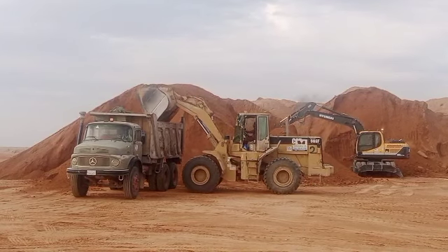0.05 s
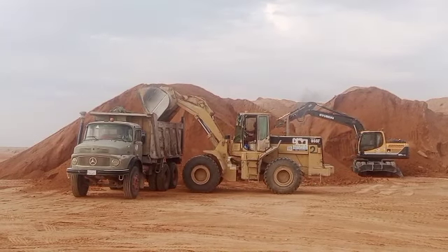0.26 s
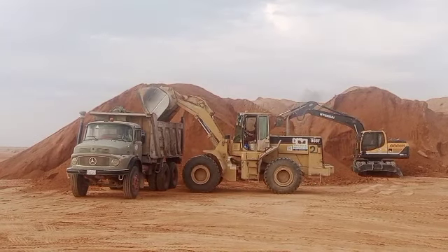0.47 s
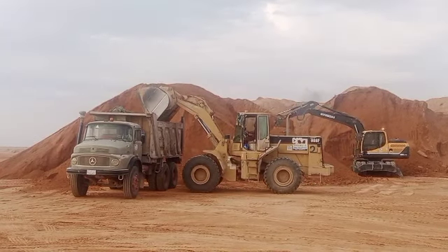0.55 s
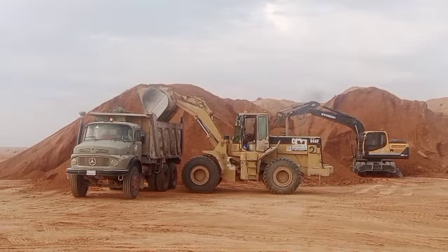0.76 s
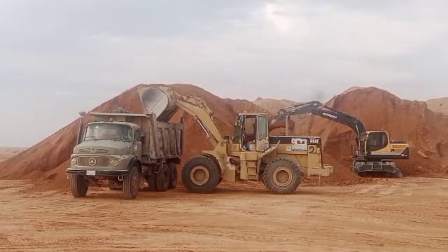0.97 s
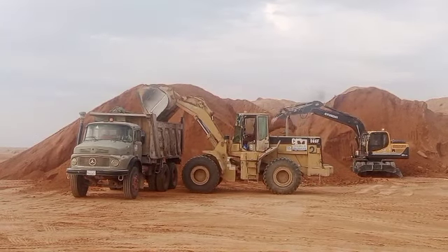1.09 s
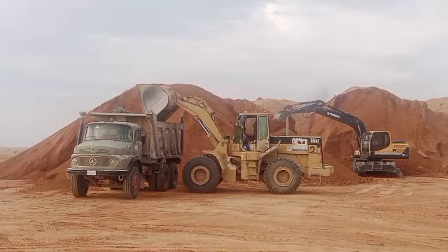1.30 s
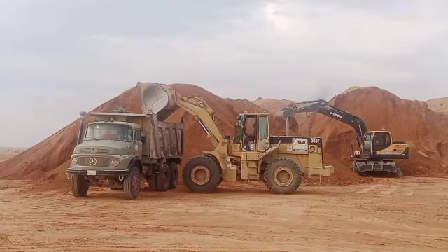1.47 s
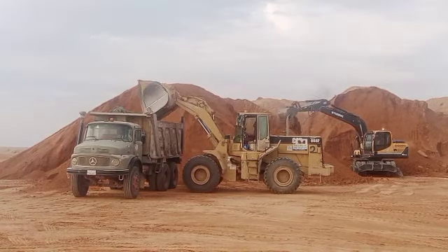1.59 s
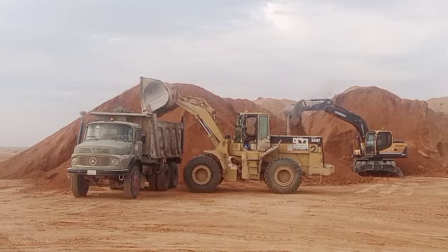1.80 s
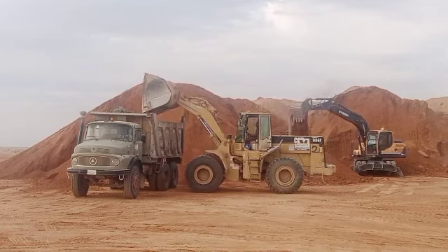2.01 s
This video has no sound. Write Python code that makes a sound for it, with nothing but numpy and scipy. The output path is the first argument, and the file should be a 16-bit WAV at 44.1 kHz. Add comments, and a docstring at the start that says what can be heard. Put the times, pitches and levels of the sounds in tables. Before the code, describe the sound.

A loader bucket hits a dump truck's steel bed at about 0.2 seconds, juddering and scraping with a short squeal until 0.4. The bed booms and rings out. Duller hollow knocks follow from 0.5 to 1.8 seconds, with faint squeaks. Diesel engines rumble and whine quietly throughout, growing a little louder after 1.2 seconds, and soft hydraulic groans join from about 1.4 seconds.

```python
"""Diesel engines rumble across a site with a rasping whine, soft hydraulic groans and faint squeaks.
Almost at once a loader's bucket strikes the steel bed of a dump truck. It judders along the bed for
a fifth of a second with a short squeal, and the bed booms and rings out. Duller knocks follow as the
bucket lifts clear, and the engines grow a little louder."""
import sys
import numpy as np
from scipy import signal
from scipy.fft import rfft, irfft
from scipy.io import wavfile

SR = 44100
rng = np.random.default_rng(int(sys.argv[2]) if len(sys.argv) > 2 else 0)


def generate_wav(sig):
    """Save sig (samples, or channels by samples) to the path in sys.argv[1] as 16-bit PCM at SR."""
    pcm = np.round(np.clip(np.atleast_2d(sig).T, -1, 1) * 32767).astype(np.int16)
    wavfile.write(sys.argv[1], SR, pcm)


N = 90404
T = np.arange(N) / SR

# how loud the engines' rumble, clatter and whine are over time: time_s, level_db
RUMBLE_LEVEL = [(0, -54), (.3, -52), (.62, -53), (.68, -46.5), (.78, -50.5), (.8, -61), (.93, -56.5),
                (1.02, -54), (1.3, -48), (1.68, -54.5), (1.78, -46.5), (1.93, -56.5), (2.05, -46)]
CLATTER_LEVEL = [(0, -66), (.62, -63.5), (.84, -60), (.95, -60), (1.06, -63), (1.2, -54.5), (1.36, -55.5),
                 (1.64, -55.5), (1.71, -60), (1.76, -54.5), (1.9, -58.5), (2.05, -55)]
WHINE_LEVEL = [(0, -67), (.2, -60.5), (.43, -56), (.6, -62.5), (.68, -55), (.8, -61), (1.13, -60),
               (1.25, -53.5), (1.47, -53.5), (1.7, -59), (1.8, -53), (1.94, -63.5), (2.03, -53.5)]
# the mix of low and high in the engines' rumble, clatter and hiss: frequency_hz, relative_db
RUMBLE_TONE = [(20, -33), (40, -17), (62, -7), (100, -6.5), (150, -4), (230, 0.5), (330, -7.5),
               (410, -17.5), (520, -28), (1000, -68)]
CLATTER_TONE = [(200, -34), (490, -11), (610, 3.5), (730, 5), (900, 4), (1150, 2.5), (1380, -4.5),
                (1900, -10), (2150, -28), (2600, -31.5), (3600, -25.5), (4500, -54.5), (6000, -65.5)]
HISS_TONE = [(1000, -5), (2400, 3.5), (3000, -6.5), (3700, -8), (4600, -21.5), (5500, -22.5), (6400, -12),
             (7500, -15), (8800, -24), (15500, -25.5)]
# groans of the hydraulics: start_s, hold_s, pitch_hz, level_db
GROANS = [(-0.02, 0.064, 627, -62.5), (1.396, 0.28, 714, -55.5), (1.595, 0.059, 902, -56),
          (1.614, 0.03, 1130, -62.5), (1.813, 0.18, 871, -64.5)]
# dull knocks of the bed and the arm's joints: start_s, level_db, pitch_hz, length_s
KNOCKS = [(0.015, -49.5, 232.3, 0.082), (0.164, -46.5, 243, 0.049), (0.492, -38.5, 242, 0.041),
          (0.54, -36.5, 212, 0.037), (0.636, -44, 268, 0.036), (0.665, -40, 214, 0.039),
          (0.715, -40, 175.6, 0.078), (0.761, -39.5, 255.7, 0.031), (1.008, -43, 237.6, 0.068),
          (1.11, -49, 234.3, 0.09), (1.23, -41, 138, 0.036), (1.299, -43.5, 147, 0.041),
          (1.42, -37.5, 229, 0.031), (1.551, -42.5, 290, 0.023), (1.578, -46, 346, 0.053),
          (1.738, -37, 248, 0.024), (1.8, -49.5, 224, 0.063)]
# the deep boom of the hollow bed: frequency_hz, relative_db
BOOM_TONE = [(25, -43.5), (48, -32), (80, -8), (130, 15.5), (280, 4), (350, 4), (450, -39), (600, -51.5),
             (1200, -81)]
# squeaks of steel: start_s, hold_s, pitch_hz, level_db, noise_share
SQUEAKS = [(0.135, .085, 9128, -80, .08), (0.22, 0.04, 6820, -69, .15), (0.259, 0.013, 6850, -54, .12),
           (0.259, 0.017, 3680, -48, .3), (0.262, 0.03, 3880, -58, 1), (0.259, 0.04, 7500, -72, 1.5),
           (0.333, 0.02, 7600, -71, 1.3), (0.324, 0.015, 6080, -76, .5), (0.366, 0.045, 3260, -62, .4),
           (0.42, 0.14, 3190, -66, .4), (0.504, 0.06, 7810, -85, .8), (0.505, 0.05, 6100, -85, .8),
           (0.294, 0.024, 1720, -40, .5), (0.332, 0.022, 1165, -39, .3), (0.46, 0.018, 1630, -43, .4),
           (0.325, 0.085, 780, -47.5, .8), (1.214, 0.025, 7490, -74, .7), (1.338, 0.018, 7410, -77, .8),
           (1.4, 0.05, 7300, -86, .6)]
# moments when the bucket bites into the bed: start_s, level_db
BITES = [(0.21, -36.5), (0.25, -35), (0.297, -38.5), (0.332, -39.5), (0.378, -47.5)]
# the scrape of steel on steel: frequency_hz, relative_db
SCRAPE_TONE = [(280, -27), (450, -11.5), (583, 2.5), (1000, 3), (1170, -0.5), (1420, -5), (1690, 5),
               (2070, -6.5), (2280, -26.5), (2500, -8), (2850, -24), (3300, -12.5), (3900, -28.5),
               (4600, -53), (5600, -51.5), (6300, -45.5), (7600, -34.5), (8800, -60), (12500, -55),
               (15500, -74)]
# ringing notes of the bucket's lip and of the bed: pitch_hz, level_db, ring_s (time to fade 60 dB)
LIP_NOTES = [(620.7, -27, 0.095), (912, -38, 0.099), (977, -37.5, 0.36), (1168, -38, 0.23),
             (1652, -42.5, 0.59)]
BED_NOTES = [(77.8, -34, 0.4), (146.4, -28, 0.75), (199, -32.5, 0.2), (242, -44.5, 0.1),
             (277.2, -26.5, 0.22), (349.3, -29.5, 0.11), (406, -34, 0.09), (1160, -49.5, 0.38)]
# blows of the bucket on the bed: start_s, level_db
BLOWS = [(0.223, -3.5), (0.24, -4), (0.258, 2.5), (0.302, -8.5), (0.325, -6.5), (0.347, -16.5), (0.386, -8)]


def amp(db):
    """Turns decibels into a number to multiply a sound by."""
    return 10 ** (np.asarray(db) / 20)


def unit(x):
    """Scales a sound to an average strength (rms) of 1."""
    return x / np.sqrt(np.mean(x ** 2) + 1e-20)


def level(points):
    """A loudness curve through (time_s, level_db) points."""
    return amp(np.interp(T, *np.transpose(points)))


def colour(x, tone):
    """Gives a sound the mix of low and high in a tone table, at strength 1."""
    hz, db = np.transpose(tone)
    curve_db = np.interp(np.log(np.fft.rfftfreq(N, 1 / SR) + 1), np.log(hz), db)
    return unit(irfft(rfft(x) * amp(curve_db), N))


def band(hz, width_hz):
    """Noise gathered around one pitch. Around 0 Hz it is a random wobble."""
    distance = (np.fft.rfftfreq(N, 1 / SR) - hz) / (width_hz / 2)
    return unit(irfft(rfft(rng.standard_normal(N)) / (1 + distance ** 2) ** 1.346, N))


def patchy(x, depth_db, span_hz, span_s):
    """Makes a sound louder and softer in random patches of time and pitch."""
    f, t, spectrum = signal.stft(x, SR, nperseg=512, noverlap=384)
    field = np.fft.fft2(rng.standard_normal(spectrum.shape))
    blur = (np.fft.fftfreq(len(f), f[1])[:, None] * span_hz) ** 2
    blur = blur + (np.fft.fftfreq(len(t), t[1]) * span_s) ** 2
    drift = np.clip(unit(np.fft.ifft2(field * np.exp(-2 * blur)).real), -2, 2)
    return signal.istft(spectrum * amp(depth_db * drift), SR, nperseg=512, noverlap=384)[1][:N]


def rise_and_fade(start_s, rise_s, hold_s, fall_db_per_s):
    """A loudness curve that rises, then begins to fade hold_s after its start."""
    return np.clip((T - start_s) / rise_s, 0, 1) * amp(-fall_db_per_s * np.maximum(T - start_s - hold_s, 0))


def swell(start_s, length_s):
    """A quick rise and slower fall, over after one and a half lengths."""
    progress = np.clip((T - start_s) / (1.5 * length_s), 0, 1)
    return np.sin(np.pi * progress ** 0.46) ** 2


def sing(hz, width_hz, noise_share, waver):
    """A wavering note inside a band of rasping noise."""
    pitch_hz = hz * (1 + waver * band(0, 55.9))
    return np.sin(2 * np.pi * np.cumsum(pitch_hz) / SR) + noise_share * band(hz, width_hz)


def engines(firing_hz=43.9, throb_depth=0.045, lump_db=2.0, hiss_db=-76.5):
    """Diesels rumble, clatter and whine, throbbing slightly as they fire, over a faint hiss."""
    rate_hz = firing_hz * (1 + 0.042 * band(0, 7.8))
    throb = 1 + throb_depth * np.cos(2 * np.pi * np.cumsum(rate_hz) / SR)
    lumpy = throb * rng.standard_normal(N) * amp(lump_db * band(0, 38))
    rumble = colour(lumpy, RUMBLE_TONE) * level(RUMBLE_LEVEL)
    churning = patchy(throb * rng.standard_normal(N), depth_db=5.5, span_hz=152, span_s=0.054)
    clatter = colour(churning, CLATTER_TONE) * level(CLATTER_LEVEL)
    flickering = patchy(rng.standard_normal(N), depth_db=4.5, span_hz=303, span_s=0.069)
    hiss = amp(hiss_db) * colour(flickering, HISS_TONE)
    return rumble + clatter + whine(throb) + hiss


def whine(throb, pitch_hz=1626.5, hz_per_db=7, wander_hz=34.65, flutter_db=1.76):
    """The machines' rasp flutters, wanders and rises in pitch as they work harder."""
    effort_db = np.interp(T, *np.transpose(WHINE_LEVEL))
    shift_hz = hz_per_db * (effort_db - effort_db.mean()) + wander_hz * band(0, 14.35)
    steady = signal.hilbert(band(pitch_hz, width_hz=217))
    rasp = (steady * np.exp(2j * np.pi * np.cumsum(shift_hz) / SR)).real  # slides the pitch by shift_hz
    return amp(effort_db) * unit(throb * rasp * amp(flutter_db * band(0, 50)))


def groans():
    """The hydraulics hum on unsteady notes while the arm moves."""
    return sum(amp(db) * rise_and_fade(start_s, 0.012, hold_s, fall_db_per_s=339)
               * sing(hz, width_hz=90, noise_share=0.65, waver=0.015)
               for start_s, hold_s, hz, db in GROANS)


def knocks(noise_share=0.22):
    """Each hollow knock is one note of a steel panel in a puff of the bed's boom."""
    puff = noise_share * colour(rng.standard_normal(N), BOOM_TONE)
    return sum(amp(db) * swell(start_s, length_s) * (np.sin(2 * np.pi * hz * (T - start_s)) + puff)
               for start_s, db, hz, length_s in KNOCKS)


def squeaks():
    """Sticking steel sings briefly, on a pure or a rough note."""
    return sum(amp(db) * rise_and_fade(start_s, 0.009, hold_s, fall_db_per_s=589.5)
               * sing(hz, width_hz=0.07 * hz, noise_share=noise_share, waver=0.00074)
               for start_s, hold_s, hz, db, noise_share in SQUEAKS)


def grind(slips_per_s=4000, spread_db=3, boom_db=-31):
    """Each bite of the bucket sets off many tiny slips of steel and grit, while the hollow bed booms."""
    slips = (rng.random(N) < slips_per_s / SR) * rng.choice([-1, 1], N)
    slips = slips * amp(spread_db * np.minimum(rng.exponential(1, N), 2))  # some slips are louder
    bites = [amp(db) * rise_and_fade(start_s, 0.014, 0, fall_db_per_s=108.5) for start_s, db in BITES]
    force = np.sqrt(sum(bite ** 2 for bite in bites))
    scrape = force * colour(patchy(slips, depth_db=3.5, span_hz=150, span_s=0.031), SCRAPE_TONE)
    boom = colour(rng.standard_normal(N), BOOM_TONE)
    boom *= rise_and_fade(start_s=0.213, rise_s=0.016, hold_s=0.19, fall_db_per_s=163)
    return scrape + amp(boom_db) * boom


def lip_clang(start_s=0.213, rise_s=0.005):
    """The bucket's steel lip rings with a few notes as it lands."""
    return sum(amp(db) * rise_and_fade(start_s, rise_s, 0, 60 / ring_s)
               * np.sin(2 * np.pi * hz * (T - start_s)) for hz, db, ring_s in LIP_NOTES)


def bed_blows(contact_s=0.003, thud_db=-29, thud_fade_s=0.037):
    """Each blow gives a low thud and sets the truck bed's own notes ringing."""
    out, t = np.zeros(N), T[:SR]
    notes = np.array([amp(db - 60 * t / ring_s) * np.exp(2j * np.pi * hz * t)
                      for hz, db, ring_s in BED_NOTES])
    boom = colour(rng.standard_normal(N), BOOM_TONE)
    for start_s, db in BLOWS:
        phases = np.exp(2j * np.pi * rng.random(len(BED_NOTES)))  # each wave starts at a random point
        ring = (phases @ notes).real
        at = round(start_s * SR)
        thud = amp(thud_db - 60 * t / thud_fade_s) * boom[at:at + SR]
        out[at:at + SR] += amp(db) * np.minimum(t / contact_s, 1) * (ring + thud)
    return out


def scene():
    """The bucket on the truck and the machines around it, added into one channel."""
    return (bed_blows() + lip_clang() + grind() + knocks() + squeaks() + groans() + engines())[None]


def record(dry, low_cut_hz=40.5, high_cut_hz=15500):
    """The microphone loses the deepest bass, and the recorder cuts the highest treble."""
    thinned = signal.sosfilt(signal.butter(2, low_cut_hz, "high", fs=SR, output="sos"), dry)
    treble_cut = signal.firwin(511, high_cut_hz, window=("kaiser", 9), fs=SR)
    return signal.oaconvolve(thinned, treble_cut[None], "same")


dry = scene()
out = record(dry)
generate_wav(out)
```